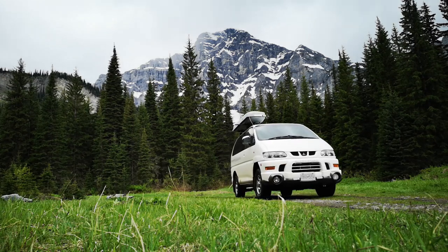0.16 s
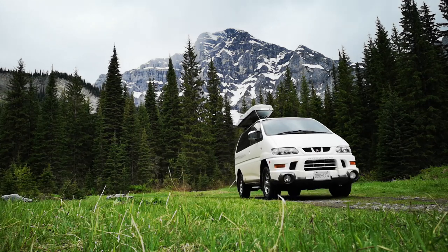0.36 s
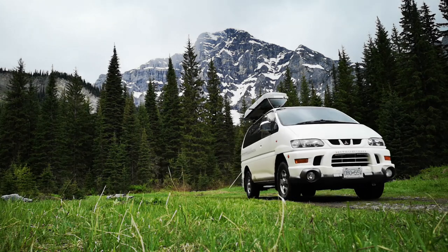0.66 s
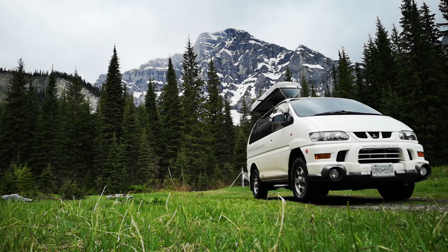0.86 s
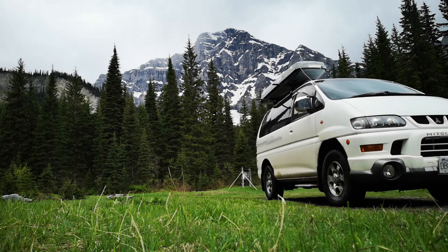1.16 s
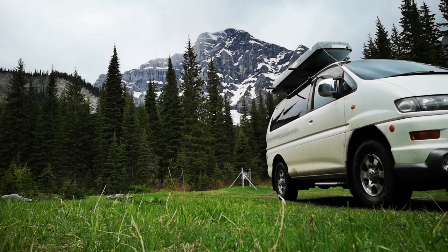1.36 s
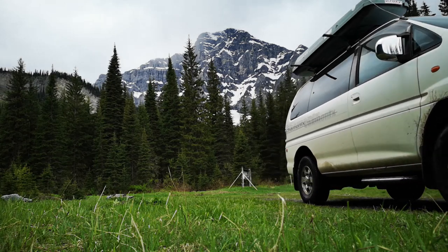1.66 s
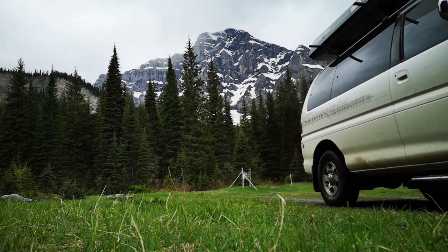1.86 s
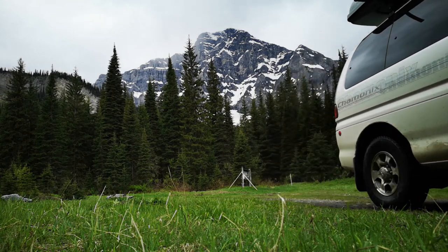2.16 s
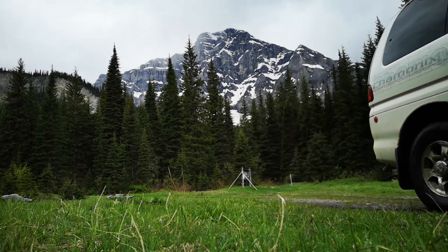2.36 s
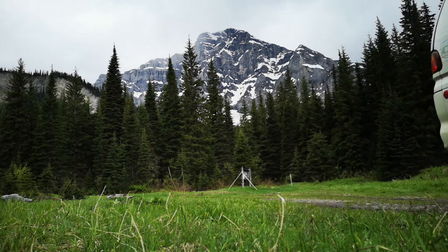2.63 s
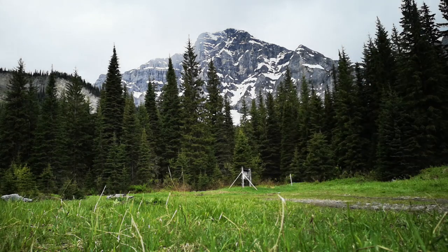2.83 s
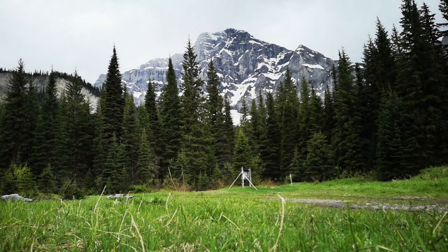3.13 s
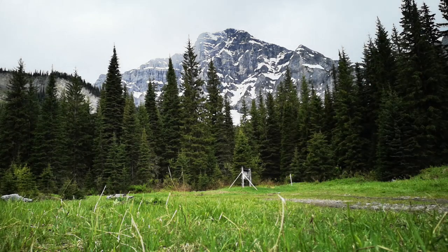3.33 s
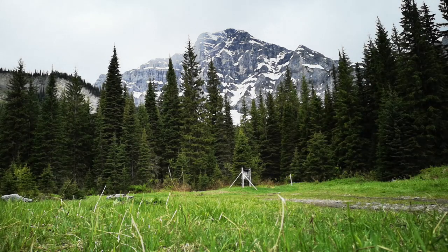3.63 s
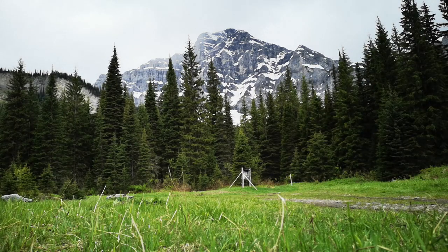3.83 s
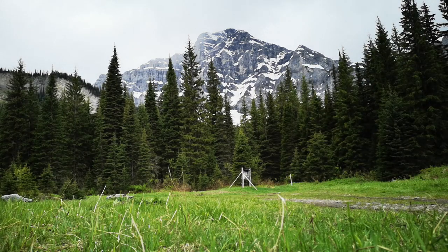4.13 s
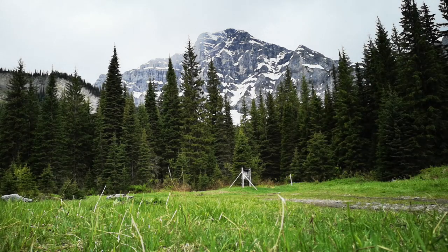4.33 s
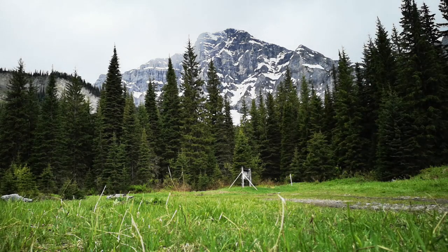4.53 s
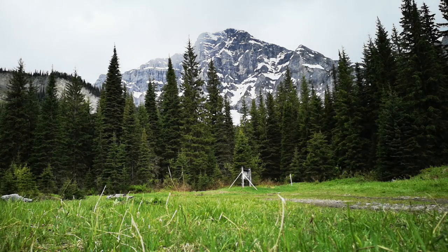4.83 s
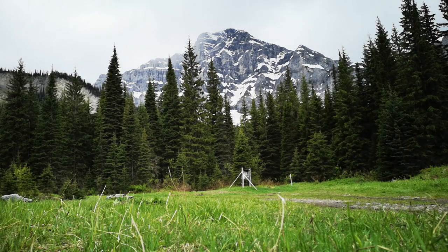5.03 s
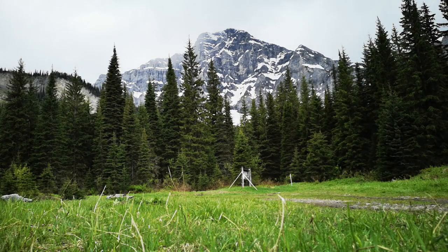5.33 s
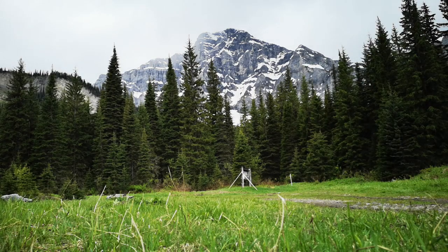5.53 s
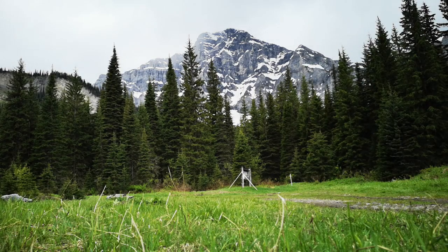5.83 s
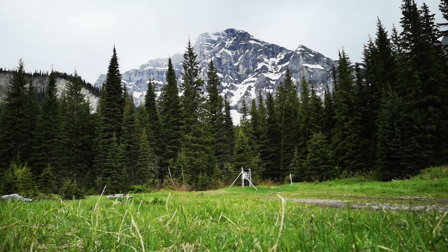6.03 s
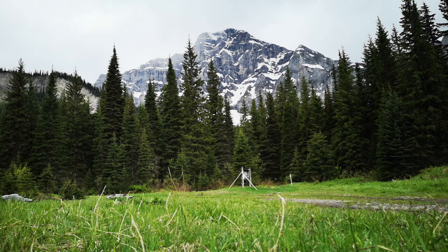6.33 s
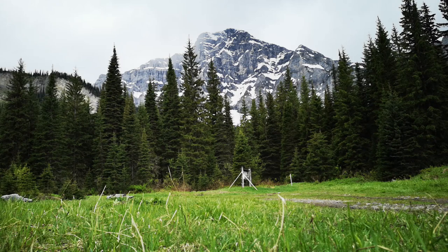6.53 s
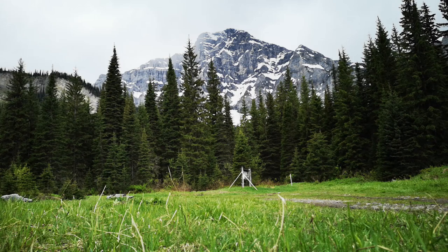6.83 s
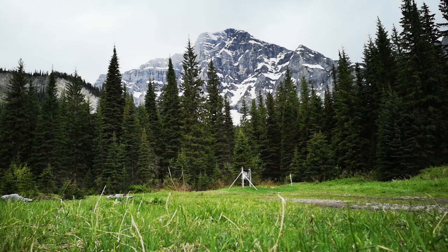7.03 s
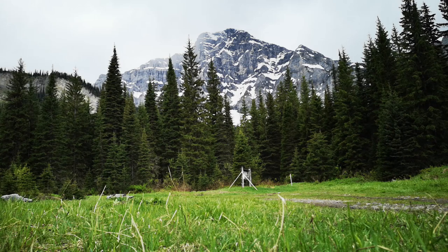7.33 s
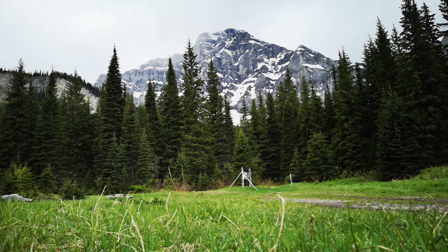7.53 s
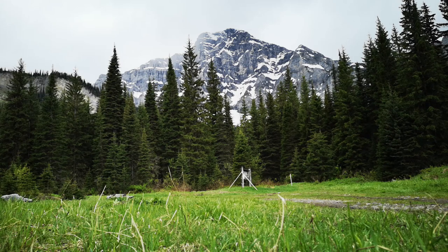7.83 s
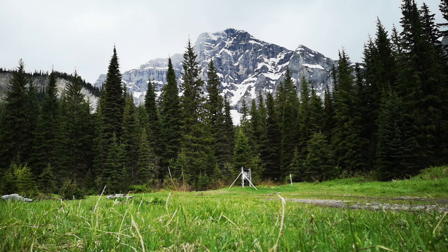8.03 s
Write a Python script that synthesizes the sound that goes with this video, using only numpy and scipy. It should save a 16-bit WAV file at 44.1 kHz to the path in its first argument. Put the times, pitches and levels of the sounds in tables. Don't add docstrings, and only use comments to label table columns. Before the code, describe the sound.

Low throbbing van drives past over grass and stops idling nearby, followed by a chirping hinge, rustling seat fabric, another squeal and a heavy door slam.

```python
import sys
import numpy as np
from scipy import signal
from scipy.fft import rfft, irfft, next_fast_len
from scipy.io import wavfile
from scipy.ndimage import uniform_filter1d

SR = 44100
rng = np.random.default_rng(int(sys.argv[2]) if len(sys.argv) > 2 else 0)


def invert_db(x):
    u = np.asarray(x, float) / 20
    return 10 ** u


def to_wav(sig):
    pcm = np.clip(np.atleast_2d(sig), -1, 1) * 32767
    pcm = np.round(pcm).astype(np.int16)
    wavfile.write(sys.argv[1], SR, pcm.T)


N = 361179
T = np.arange(N) / SR


def rms_one(x):
    return x / np.sqrt(np.mean(x ** 2) + 1e-20)


def in_time(rows, t=T):
    s, *columns = np.transpose(rows)
    return [np.interp(t, s, c) for c in columns]


def at_hz(points, hz):
    corner_hz, db = np.transpose(points)
    return np.interp(np.log(hz), np.log(corner_hz), db)


def span(rows):
    return slice(round(rows[0][0] * SR), round(rows[-1][0] * SR))


def gate(rows, edge_s):
    t = T[span(rows)]
    return np.clip(np.minimum(t - t[0], t[-1] - t) / edge_s, 0, 1)


def swells(rows):
    return sum(up_db * np.exp(-((T - s) / half_s) ** 2) for s, half_s, up_db in rows)


def drift(rate, size=N):
    r = np.exp(-40 * np.pi * rate / SR)
    slow = signal.lfilter([1], [1, -2 * r, r * r], rng.standard_normal(N // 20 + 4002))[4000:]
    return np.interp(np.arange(size) / 20, np.arange(len(slow)), rms_one(slow))


# frequency in Hz, share of power common to both.
COHERENCE = [(100, 1), (500, 0.9), (900, 0.96), (1500, 0.75), (3000, 0.12), (8000, 0.1)]


def noise(spectrum, size=N, peaks=()):
    padded = next_fast_len(size)
    hz = np.maximum(np.fft.rfftfreq(padded, 1 / SR), 1)
    gain = invert_db(at_hz(spectrum, hz)) * (hz > spectrum[0][0]) * (hz < spectrum[-1][0])
    for centre_hz, width_hz, peak_db in peaks:
        detune = 2 * (hz - centre_hz) / width_hz
        gain *= np.sqrt(1 + invert_db(2 * peak_db) / (1 + detune ** 2))
    alike = np.clip(at_hz(COHERENCE, hz), 0, 1)
    shares = np.sqrt([alike, 1 - alike, 1 - alike])
    white = rfft(rng.standard_normal((3, padded)))
    out = irfft(white * shares * gain, padded)[:, :size]
    return out / np.std(out[0] + out[1])


def ports(parts, lag_ms):
    bass = signal.sosfiltfilt(signal.butter(2, 1000, fs=SR, output="sos"), parts[0])
    n, lag = np.arange(N), lag_ms * SR / 1000
    late_bass = np.interp(n - 1.706 * lag, n, bass)
    late_treble = np.interp(n - lag, n, parts[0] - bass)
    return np.array([late_bass + late_treble + parts[1], parts[0] + parts[2]])


def strike(out, s, db, hz, t60):
    at = round(s * SR)
    t = T[:min(N - at, int(t60 * SR) + 1)]
    contact = 1 - np.exp(-t / 0.0014)
    out[at:at + len(t)] += invert_db(db - 60 * t / t60) * contact * np.sin(2 * np.pi * hz * t)


def stroke(start_s, rise_s, hold_s, fall_s, db, sag_db_per_s=10):
    end_db = db - sag_db_per_s * hold_s
    top_s = start_s + rise_s
    end_s = top_s + hold_s
    return [(start_s, db - 17.5), (top_s, db), (end_s, end_db), (end_s + fall_s, end_db - 18.5)]


def burst(rows, spectrum, grain_db, peaks=()):
    out, t = np.zeros((3, N)), T[span(rows)]
    level_db = in_time(rows, t)[0] + grain_db * drift(51, size=len(t))
    friction = noise(spectrum, size=len(t), peaks=peaks)
    out[:, span(rows)] = gate(rows, 0.014) * invert_db(level_db) * friction
    return out


# time in seconds, firing rate of one bank in Hz.
FIRING_RATE = [(0.0, 34.9), (0.52, 36.7), (0.7, 35.4), (0.92, 32.0), (1.36, 32.2), (1.52, 30.9),
               (1.86, 26.5), (1.98, 27.1), (2.2, 24.3), (2.39, 20.3), (3.07, 20.6), (3.95, 20.0),
               (4.45, 18.5), (5.07, 19.1), (5.51, 18.7), (5.81, 21.7), (6.51, 23.6), (7.3, 24.3)]


def crankshaft():
    bank_hz, = in_time(FIRING_RATE)
    turn = 2 * np.pi * np.cumsum(bank_hz) / SR - 2.4 + .03 * drift(3)
    firing = 1 + 0.11 * np.cos(2 * turn) + 0.016 * np.cos(turn)
    return bank_hz, turn, firing


# frequency in Hz, gain in dB.
MUFFLER = [(37, 1), (42, 3.5), (48, -2.5), (56, -11.5), (62, -1.5), (70, 0.5), (105, 0), (170, -11.5)]
TAILPIPE_ORDERS = {2: 0.0, 3: 1.1, 5: -14}
FACING_ORDERS = {1: -26, 7: -13.5, 9: -16}
# middle in seconds, half length in seconds, lift in dB.
SHADED = [
    (2.2, 0.37, -7),
]
# middle in seconds, half length in seconds, lift in dB.
CLEAR = [
    (.3, .5, 3),
    (7.0, 1.2, 3.5),
]


def exhaust_orders(bank_hz, turn, pipe_end_db, roar_db, facing):
    low = {}
    for order, db in TAILPIPE_ORDERS.items():
        low[order] = pipe_end_db + db + at_hz(MUFFLER, order * bank_hz)
    order_db = [low[2] + swells(SHADED), low[3], roar_db - 0.5, low[5]]
    dulling_db = .35 + 2.5 * facing
    order_db += [roar_db - 6 + swells(CLEAR) - dulling_db * k for k in range(9)]
    count = len(order_db)
    scatter = rng.uniform(0, 2 * np.pi, count) * (np.arange(count) > 3)
    flutter = [drift(9.0), drift(4.5)]
    out = np.zeros(N)
    for k, level_db in enumerate(order_db):
        spread = (1 - facing) * (1.076 * k * k % 6.28 + scatter[k])
        level = np.sqrt(2) * invert_db(level_db + 1.3 * flutter[k % 2])
        out += level * np.sin((k + 2) * turn + np.pi / 2 + spread)
    for order, db in FACING_ORDERS.items():
        out += np.sqrt(2) * invert_db(pipe_end_db + db) * facing ** 3.7 * np.cos(order * turn)
    return out


# frequency in Hz, width in Hz.
PIPES = [(337, 16.3), (408, 34)]
# middle in seconds, half length in seconds, lift in dB.
DRONES = [
    (.5, 0.21, 10),
    (1.4, 0.34, 10.5),
    (3.55, .2, 11),
    (3.95, 0.47, 13),
    (5.1, 0.26, 6.5),
]


def pipes(bank_hz, turn, firing, load_db, abeam_s):
    idling = (T > abeam_s) * (.5 + .5 * np.tanh(bank_hz - 21.6)) - (T < abeam_s)
    low_db = -53 + .9 * load_db + swells(DRONES)
    high_db = -58.5 + .9 * load_db + 9.5 * uniform_filter1d(idling, size=22050)
    puffs = firing * rng.standard_normal(N)
    out = np.zeros(N)
    for (hz, width_hz), pipe_db in zip(PIPES, [low_db, high_db]):
        r = np.exp(-np.pi * width_hz / SR)
        pipe = signal.lfilter([1, 0, -1], [1, -2 * r * np.cos(2 * np.pi * hz / SR), r * r], puffs)
        out += invert_db(pipe_db - 12) * rms_one(pipe)
        nearest = np.round(hz / bank_hz)
        for order in (nearest - 1, nearest, nearest + 1):
            detune = 2 * (order * bank_hz - hz) / width_hz
            out += invert_db(pipe_db) * np.sin(order * turn) / (1 + detune ** 2)
    return out


# frequency in Hz, level in dB per Hz.
RUMBLE = [(12, -25), (20, 3), (40, 2), (80, 0.5), (130, -16.5), (200, -40)]
ROAR = [(65, -32), (110, -2.5), (160, -6), (253, -7), (296, -9.5), (333, -1.5), (367, -11.5), (404, -13),
        (465, -9.5), (650, -24), (840, -50), (1430, -120)]
CLATTER = [(290, -39), (500, -3), (574, 3), (869, 2), (1440, -5.5), (1700, -8.5), (2210, -26), (3740, -120)]
TYRES = [(820, -31), (1400, -8), (1760, 6), (2590, -2), (3360, -8), (4500, -14.5), (5850, -51),
         (9900, -120)]
HISS = [(2060, -40.5), (3500, -8), (5330, -4.5), (6280, -5.5), (7700, -4.5), (8470, -10.5), (9260, -3),
        (11000, -18), (14800, -15.5), (15700, -20), (16200, -40)]
FAN = [(800, -25), (1200, 0.5), (1800, -7), (2600, -25), (6400, -21.5), (7600, -8.5), (8400, -22)]
# middle in seconds, half length in seconds, lift in dB.
ROCKING = [
    (1.85, 0.19, -5),
    (3.5, 0.25, 6.5),
    (4.62, 0.11, 14),
    (5.4, 0.3, 8.5),
    (6.7, .1, 11),
    (7.38, 0.17, 17),
]


def rolling_noise(controls, roar_db, turn, firing):
    # level in dB, tailpipe, nearness, load, facing
    rumble_db = np.array([-33.5, -0.22, 1.16, 0.85, -5.5]) @ controls
    clatter_db = np.array([-53.5, 0.22, 0.88, 0.32, 1.5]) @ controls
    tyres_db = np.array([-55, 0.25, 1.09, 0.49, 3]) @ controls
    hiss_db = np.array([-60.5, 0.02, 0.77, 0.24, 2.0]) @ controls
    fan_db = np.array([-79.5, -0.07, 0.17, 0, 21]) @ controls
    out = invert_db(rumble_db + swells(ROCKING) + 1.5 * drift(7.7)) * noise(RUMBLE)
    roar = invert_db(roar_db + 3.2 - .7 * swells(CLEAR) + 1.2 * drift(12.0))
    out += roar * firing * (1 + .3 * np.cos(turn)) * noise(ROAR)
    grain = drift(13.3)
    out += invert_db(clatter_db + 5.5 + 1.75 * grain) * firing ** 0.49 * noise(CLATTER)
    out += invert_db(tyres_db + 0.73 * grain + 1.2 * drift(40)) * noise(TYRES)
    out += invert_db(hiss_db + 1.74 * grain) * noise(HISS)
    out += invert_db(fan_db + 0.97 * grain) * noise(FAN)
    return out


# time in seconds, tailpipe level in dB, load in dB.
EFFORT = [(0, -47, -2.5), (.5, -45.5, 3), (.95, -49.5, -2), (1.4, -45, 0), (1.95, -46, 2.5),
          (2.2, -30.5, -3), (2.7, -36, -1), (3.2, -35, -1), (4.0, -32, -2), (5.0, -30, 1.5), (5.7, -34, 3),
          (5.85, -31, 7.5), (6.2, -32.5, 4.5), (6.5, -31.5, 3.5), (7.1, -35, 3), (7.6, -39.5, 3.5),
          (7.95, -34.5, 3.5), (8.19, -39.5, 0)]
# time in seconds, nearness in dB, left port lag in milliseconds.
PASS = [(0, -11.5, 0.072), (.43, -7.5, 0.11), (.82, -9, 0.15), (1.1, -4.5, 0.17), (1.81, 0.5, 0.31),
        (2.5, -1, 0.43), (3.16, 0, 0.42), (3.52, -4, 0.39), (3.9, -7, 0.37), (4.5, -11, 0.33),
        (6.5, -11.5, 0.34), (8.19, -11, 0.36)]


def van():
    abeam_s, turning_s = 2.04, 0.7
    bank_hz, turn, firing = crankshaft()
    pipe_end_db, load_db = in_time(EFFORT)
    near_db, lag_ms = in_time(PASS)
    facing = .5 - .5 * np.tanh((T - abeam_s) / turning_s)
    controls = np.array([np.ones(N), pipe_end_db + 30, near_db, load_db, facing])
    roar_db = np.array([-43.5, .5, 0.7368, 1, 1.9]) @ controls
    out = rolling_noise(controls, roar_db, turn, firing)
    out[0] += exhaust_orders(bank_hz, turn, pipe_end_db, roar_db, facing)
    out[0] += pipes(bank_hz, turn, firing, load_db, abeam_s)
    out += stones()
    return ports(out, np.clip(lag_ms, 0, 1))


# start in seconds, peak in dB, frequency in Hz, t60 in seconds.
KNOCKS = [(0.851, -34, 268, 0.1), (0.851, -32.5, 169, 0.098), (1.54, -34.5, 358, 0.058),
          (1.731, -34, 153, 0.06), (4.601, -23.5, 204, 0.061), (4.615, -18.5, 154, 0.07),
          (5.408, -24, 111, 0.082), (5.45, -24.5, 110, 0.09), (5.795, -28, 320, 0.15),
          (5.815, -22, 138, 0.098), (7.986, -23.5, 283, 0.035)]


def knocks(out):
    for s, level_db, hz, t60 in KNOCKS:
        for ratio, drop_db in [(1, -2), (1.6, 3), (2.9, 6.5), (4.7, 20)]:
            strike(out, s, level_db - drop_db, ratio * hz, t60 / ratio ** .4)


# start in seconds, peak in dB, frequency in Hz, t60 in seconds.
PINGS = [(1.324, -38.5, 795, 0.058), (3.651, -29.5, 1110, 0.0089), (3.651, -29, 1430, 0.0087),
         (.853, -44, 630, 0.065), (1.347, -40, 5030, .03), (7.224, -15, 500, 0.053),
         (5.797, -33.5, 700, 0.05), (3.094, -41, 2560, .05), (.853, -38, 1190, .04), (3.988, -47, 700, .08),
         (4.783, -36.5, 1820, 0.064), (4.873, -15.5, 1843, 0.017), (5.093, -40, 2540, .04),
         (5.118, -42, 2560, .06), (5.214, -39, 700, 0.04), (5.274, -41, 894, 0.06), (5.54, -54, 1720, .2),
         (5.605, -49.5, 906, 0.27), (5.61, -47.5, 1510, 0.17), (5.635, -45, 1850, 0.12),
         (7.986, -23.5, 2110, 0.012), (7.957, -43, 2500, 0.014), (1.528, -36, 2200, .012),
         (3.212, -43, 4000, .012), (3.737, -39, 2500, .015), (3, -39, 2700, .01), (1.893, -41, 5000, .02)]


def small_parts(out):
    for s, level_db, hz, t60 in PINGS:
        strike(out, s, level_db + 3.5, hz, t60)


# start in seconds, peak in dB.
TICKS = [(1.347, -44), (1.5279, -43), (1.733, -41.5), (1.8157, -36.5), (2.0203, -33.5), (2.0986, -46),
         (2.7443, -45), (3.0918, -37), (3.2106, -45), (3.5154, -47), (4.6034, -46.5), (5.0545, -43),
         (5.094, -48.5), (5.7986, -35), (5.9614, -38), (7.2298, -40), (7.2343, -36), (7.2617, -37),
         (7.3141, -45), (7.9877, -52)]


def stones():
    size, t60_s = 4096, 0.038
    grit = noise([(1500, 2.0), (8000, -3.5), (15500, -19.0)], size=len(TICKS) * size)
    out, t = np.zeros((3, N)), T[:size]
    for k, (s, level_db) in enumerate(TICKS):
        at = round(s * SR)
        grain = grit[:, k * size:(k + 1) * size]
        out[:, at:at + size] += grain * invert_db(level_db - 4.5 - 60 * t / t60_s)
    return out


# frequency in Hz, level in dB per Hz.
CLOTH = [(350, -41), (600, -0.5), (790, 4), (1350, -11), (1930, -4.5), (3480, -8), (3830, -8.5),
         (5870, -6.5), (6290, -9.5), (7110, -11), (8390, -6), (14500, -28), (16000, -54)]
# start, rise, hold and fall in seconds, level in dB.
PEELS = [
    (5.035, 0.031, 0.0046, 0.016, -57),
    (5.36, 0.033, 0.0081, 0.043, -54.5),
    (5.45, 0.035, 0.0044, 0.04, -47),
    (6.679, 0.1, .05, .07, -52),
    (7.52, 0.023, 0.012, .06, -62.5),
]


def seal_peels():
    return sum(burst(stroke(*row), CLOTH, 1.5) for row in PEELS)


# start, rise, hold and fall in seconds, level in dB.
RUBS = [
    (5.073, 0.044, .01, 0.064, -46.5),
    (5.725, 0.07, 0.39, 0.094, -42),
    (7.617, 0.064, .03, .04, -60.5),
]
# frequency in Hz, width in Hz, peak in dB.
RUBBED = [
    [(2544, 34, 20.5)],
    [(2460, 37, 4), (3420, 28, 11), (5420, 45, 9.5), (5700, 29, 0), (5760, 45, 8), (6960, 110, 16),
     (7300, 90, 10.5), (7700, 42, 4), (2840, 120, -1), (4300, 31, 7), (8950, 71, 5), (13500, 2500, 4)],
    [(2650, 190, 17)],
]


def cloth_rubs():
    return sum(burst(stroke(*row), CLOTH, 1.6, peaks) for row, peaks in zip(RUBS, RUBBED))


# frequency in Hz, gain in dB.
HINGE_BODY = [(900, -17), (2000, -5), (2900, -1), (3700, -6.5), (4600, -1), (5400, 3), (6300, -7),
              (7600, -4.5), (9300, -7), (11000, -22), (15500, -32)]
# frequency in Hz, gain in dB.
HINGE_SHADOW = [(2000, -1), (2900, -11), (3600, -3), (4200, -5), (5600, -6), (7300, -3), (9000, 0)]


def squeal(rows, waver, throb_db, count):
    out, t = np.zeros((3, N)), T[span(rows)]
    size = len(t)
    hz, level_db, harsh_db = in_time(rows, t)
    turn = 2 * np.pi * np.cumsum(hz * (1 + waver * drift(220, size=size))) / SR
    for k in range(1, count + 1):
        throb = throb_db * drift(93, size=size)
        db = 5 + level_db + harsh_db * (k - 1.5) + at_hz(HINGE_BODY, k * hz) + throb
        line = gate(rows, .002) * invert_db(db) * np.sin(k * turn) * (k * hz < 15500)
        shade = invert_db(at_hz(HINGE_SHADOW, k * hz) + 3 * drift(60, size=size))
        out[0, span(rows)] += line
        out[2, span(rows)] += (shade - 1) * line
    return out


# time in seconds, slip rate in Hz, level in dB, harshness in dB per multiple.
OPENING = [
    [(5.27, 3350, -71, -12), (5.3, 3000, -55, -8), (5.37, 2902, -50, -10), (5.42, 3030, -44.5, -1.5),
     (5.446, 3210, -53, 2.5)],
    [(5.43, 3290, -53, -4), (5.455, 3720, -41, -6), (5.49, 3805, -39, 1), (5.515, 3694, -39, -4.5),
     (5.59, 3683, -33.5, -1.5), (5.635, 3435, -38, -4), (5.658, 3340, -52, -3)],
]
SLOWING = [
    [(5.643, 3060, -47, 2), (5.662, 2950, -44, -1), (5.68, 2830, -48, 3), (5.7, 2690, -43, 4),
     (5.708, 2670, -46, 4)],
    [(5.709, 2620, -48, 3), (5.727, 2470, -45, 3), (5.734, 2400, -49, 4), (5.75, 2270, -48, 4)],
    [(5.743, 1990, -46, -2), (5.765, 1850, -43, -2), (5.778, 1690, -46, -2), (5.79, 1560, -56, 1)],
]


def hinge_opens():
    out = sum(squeal(rows, .0045, 2.5, count=4) for rows in OPENING)
    return out + sum(squeal(rows, .004, 3, count=5) for rows in SLOWING)


def brief_swell():
    clatter_swell = stroke(start_s=6.3, rise_s=.07, hold_s=.06, fall_s=.1, db=-54)
    roar_swell = stroke(start_s=6.33, rise_s=.04, hold_s=.07, fall_s=.06, db=-46)
    return burst(clatter_swell, CLATTER, 1.8) + burst(roar_swell, ROAR, 1.8)


# time in seconds, slip rate in Hz, level in dB, harshness in dB per multiple.
CLOSING = [
    [(6.696, 905, -55, -2), (6.72, 930, -52, -2), (6.725, 1015, -53, -2), (6.75, 1030, -51, -2)],
    [(6.748, 1470, -53, -1), (6.764, 1540, -51, -1), (6.77, 1720, -50, -1), (6.78, 1800, -53, -1),
     (6.788, 2200, -48, -.5), (6.802, 2300, -52, -.5)],
    [(6.792, 2760, -49, -6), (6.815, 3150, -48, 0), (6.835, 3520, -48, -1), (6.856, 3670, -43, -4),
     (6.866, 3660, -58, -3), (6.88, 3640, -64, -6), (6.9, 3620, -70, -10)],
]
WHISTLE = [
    [(6.85, 5010, -52, -4), (6.857, 5060, -49, -4), (6.866, 5200, -58, -2), (6.873, 5370, -46, -4),
     (6.884, 5560, -48, -4), (6.892, 5680, -45, -3), (6.912, 5760, -54, -2)],
    [(6.916, 5670, -50, -1), (6.923, 5654, -44, -2), (6.96, 5628, -53, -5), (6.978, 5627, -70, -5)],
]


def hinge_closes():
    out = sum(squeal(rows, .008, 4, count=12) for rows in CLOSING)
    return out + sum(squeal(rows, .004, 2, count=2) for rows in WHISTLE)


# frequency in Hz, level in dB per Hz.
SEAL = [(6000, -20), (8000, 0), (11000, -3), (15000, -6), (15800, -25)]


def seal_hiss():
    return burst(stroke(start_s=6.71, rise_s=.06, hold_s=.04, fall_s=.05, db=-58), SEAL, 1.8)


# start in seconds, level in dB, hardness in dB per octave.
SLAM = [
    (7.224, -31, 10.5),
    (7.230, -30, 5),
    (7.2365, -6.5, -1),
    (7.273, -27, 1.5),
    (7.345, -16, -3),
]
# frequency in Hz, level in dB, t60 in seconds.
PANEL = [(21.66, -17, 1.4), (44.6, -5, 0.6), (53, 3.5, 0.2), (70.6, -9, 0.45), (104.4, -4.5, 0.35),
         (135, -7, 0.3), (193.5, -6.5, 0.14), (244.4, -16, 0.2), (322, -24, 0.36), (466, -6, 0.065),
         (600, -15, .08), (709, -16, 0.11), (875, -26, 0.13)]


def slam(out):
    for s, blow_db, hard_db in SLAM:
        for hz, level_db, t60 in PANEL:
            strike(out, s, blow_db + level_db + hard_db * np.log2(hz / 100), hz, t60)


# frequency in Hz, level in dB per Hz.
BOOM = [(65, -20), (110, 0), (150, -2), (211, -8), (291, -16), (350, -19.5), (463, -17.5), (1300, -46),
        (1690, -72), (2860, -120)]
RATTLE = [(590, -25), (1000, -2), (1290, -6), (1500, -0.5), (2710, -8), (4410, -19), (7440, -23.5),
          (11400, -34), (14800, -41), (16000, -60)]


def shudder():
    start_s = 7.222
    boom = stroke(start_s, rise_s=.022, hold_s=.2, fall_s=.04, db=-14, sag_db_per_s=117)
    rattle = stroke(start_s, rise_s=.014, hold_s=.15, fall_s=.04, db=-37, sag_db_per_s=125)
    crack = stroke(start_s, rise_s=.014, hold_s=.053, fall_s=.04, db=-45, sag_db_per_s=620)
    return burst(boom, BOOM, 1.6) + burst(rattle, RATTLE, 1.6) + burst(crack, HISS, 1.6)


def door():
    out = seal_peels() + cloth_rubs() + hinge_opens() + brief_swell()
    out += hinge_closes() + seal_hiss() + shudder()
    knocks(out[0])
    small_parts(out[0])
    slam(out[0])
    return ports(out, lag_ms=0.277)


def scene():
    return van() + door()


# frequency in Hz, width in Hz, gain in dB.
LEFT_PORT = [(734, 524, -11.5), (2320, 5450, 5), (2745, 440, 2), (7920, 2920, 8.5), (9570, 1350, -6.5),
             (10250, 3800, -6)]


def left_port(x):
    for hz, width_hz, gain_db in LEFT_PORT:
        w, g = 2 * np.pi * hz / SR, invert_db(gain_db / 2)
        q = np.tan(np.pi * width_hz / SR)
        x = signal.lfilter([1 + q * g, -2 * np.cos(w), 1 - q * g], [1 + q / g, -2 * np.cos(w), 1 - q / g], x)
    return x * invert_db(0.04)


def top_cut(x):
    return signal.sosfilt(signal.butter(12, 16250, fs=SR, output="sos"), x)


def record(dry):
    both = np.array([left_port(dry[0]), dry[1]])
    rounded = .95 * np.tanh(both / .95)
    mix = signal.sosfilt(signal.cheby2(12, 60, 16350, fs=SR, output="sos"), rounded)
    return top_cut(mix)


dry = scene()
out = record(dry)
to_wav(out)
```